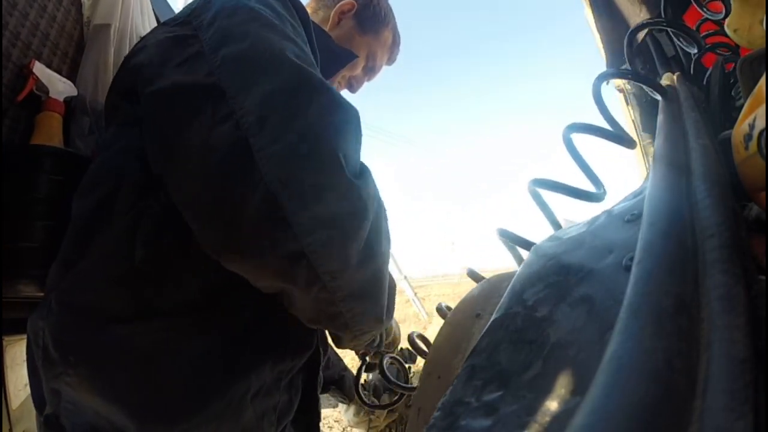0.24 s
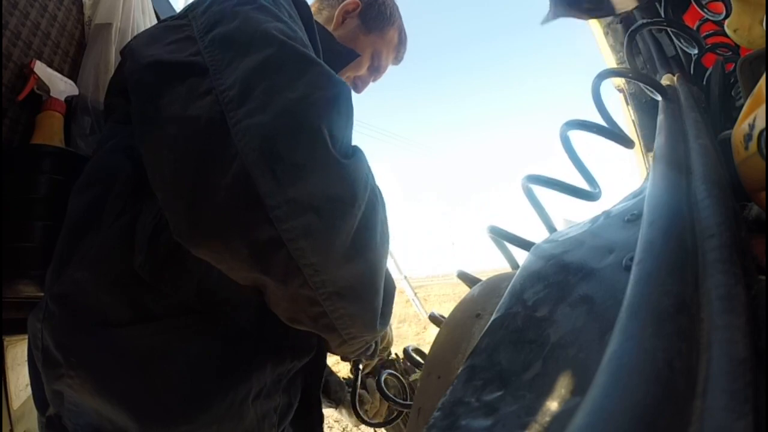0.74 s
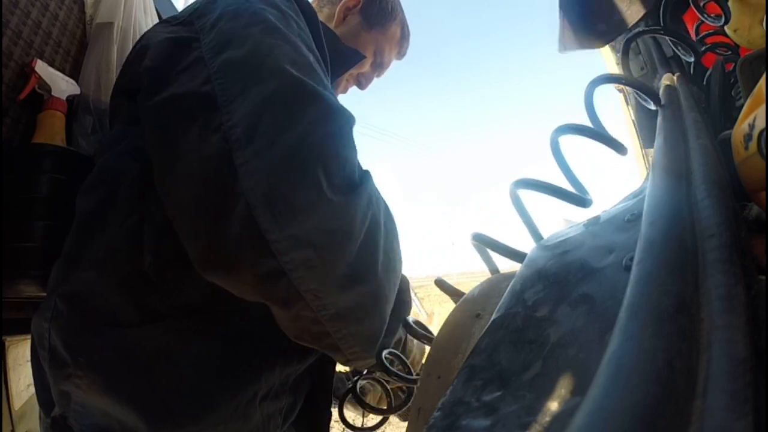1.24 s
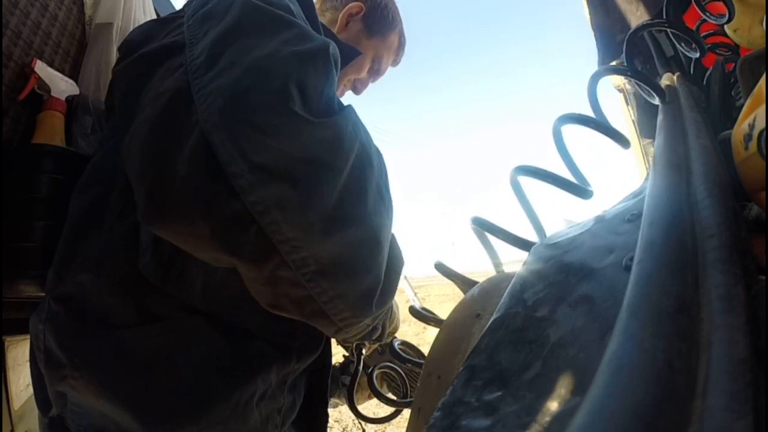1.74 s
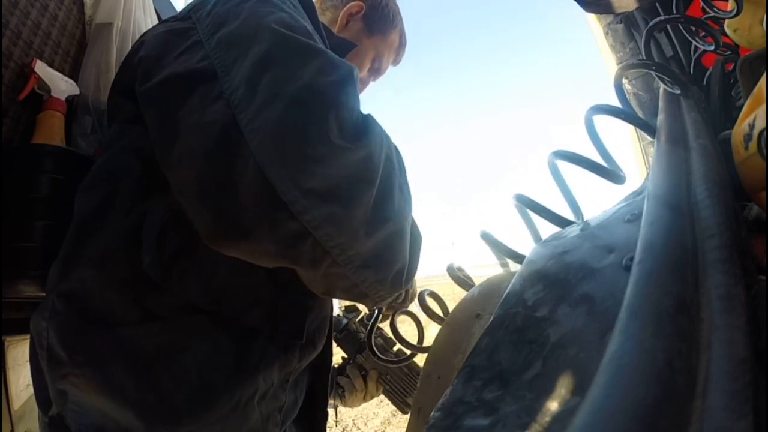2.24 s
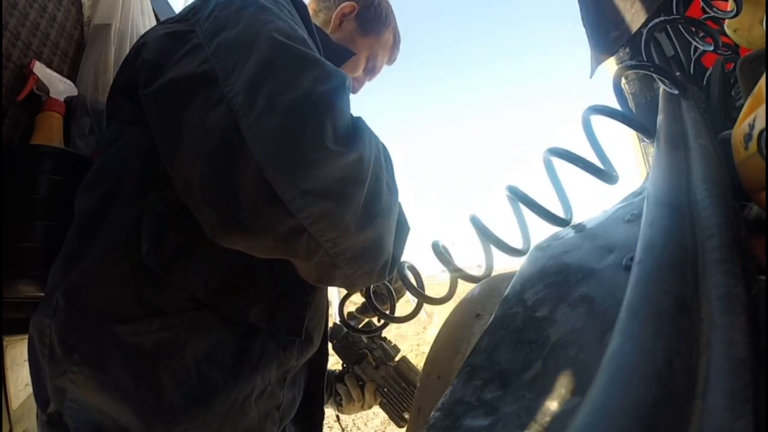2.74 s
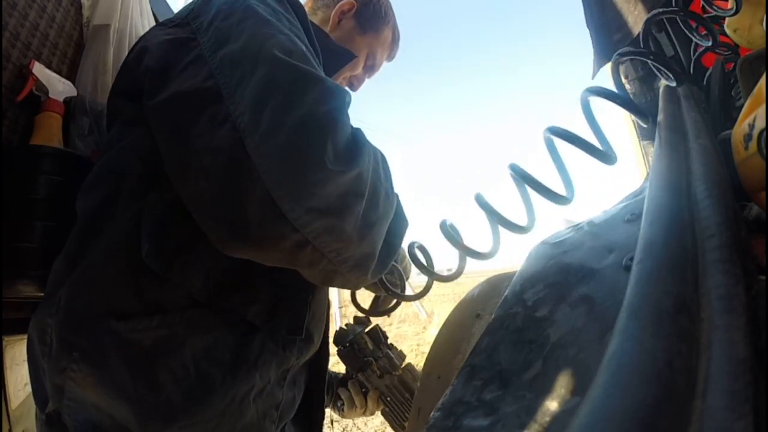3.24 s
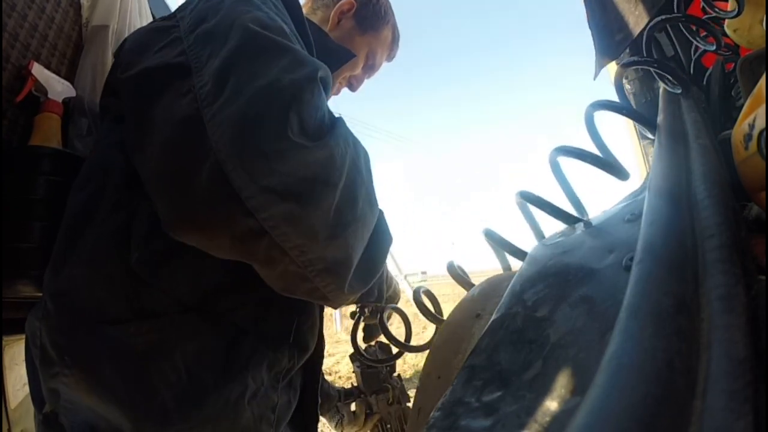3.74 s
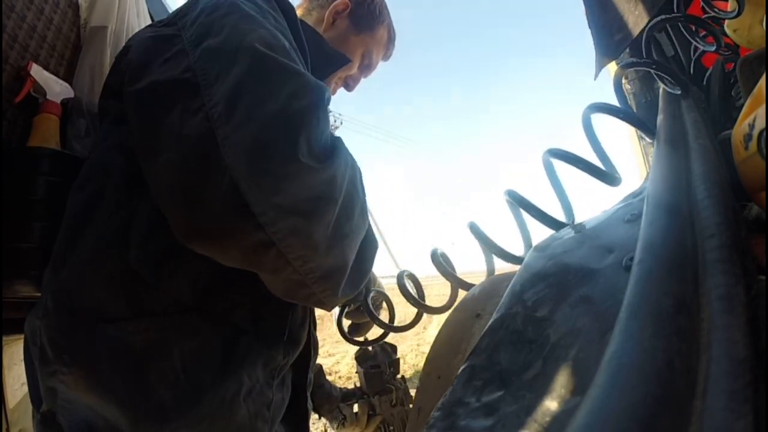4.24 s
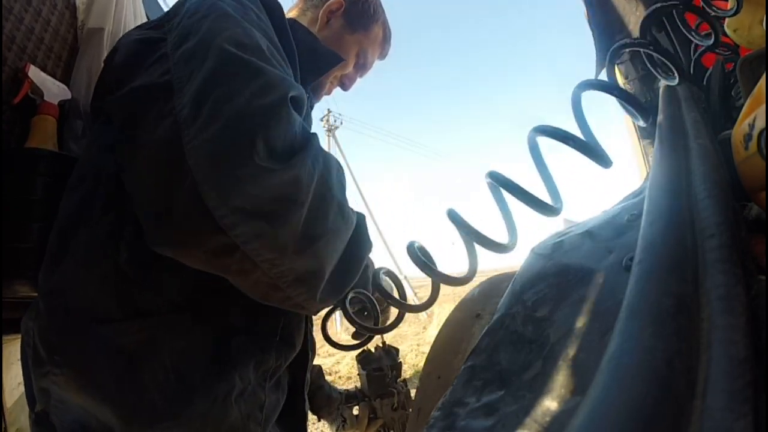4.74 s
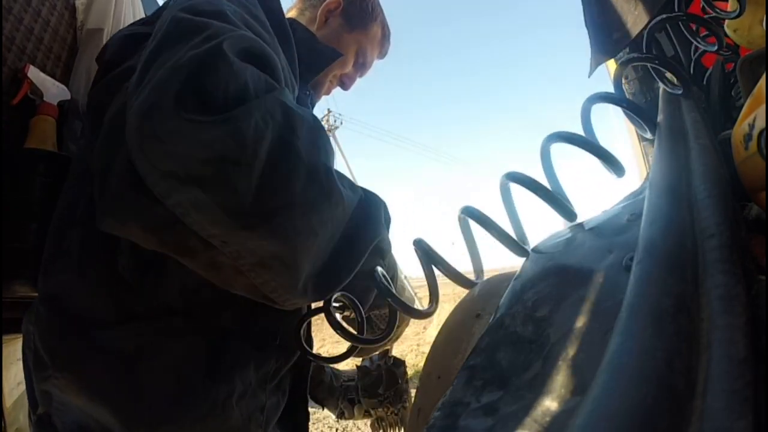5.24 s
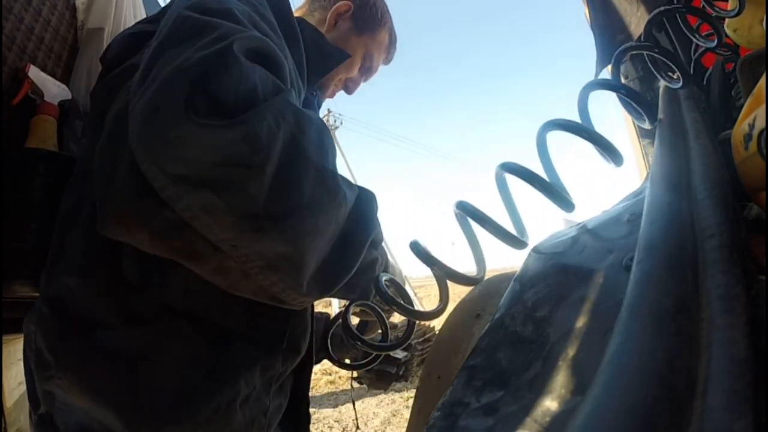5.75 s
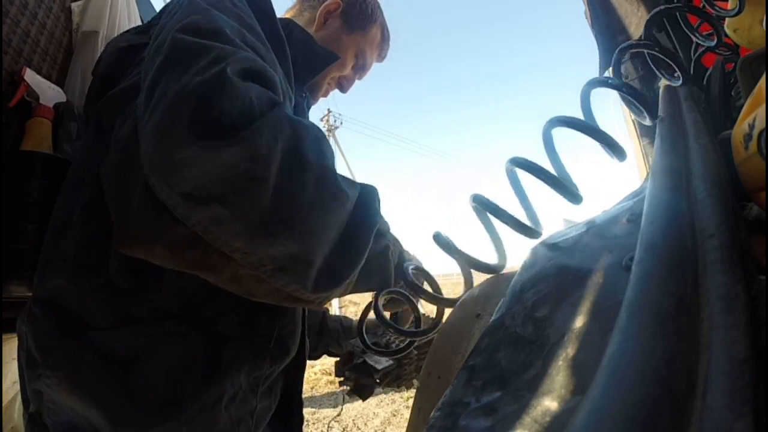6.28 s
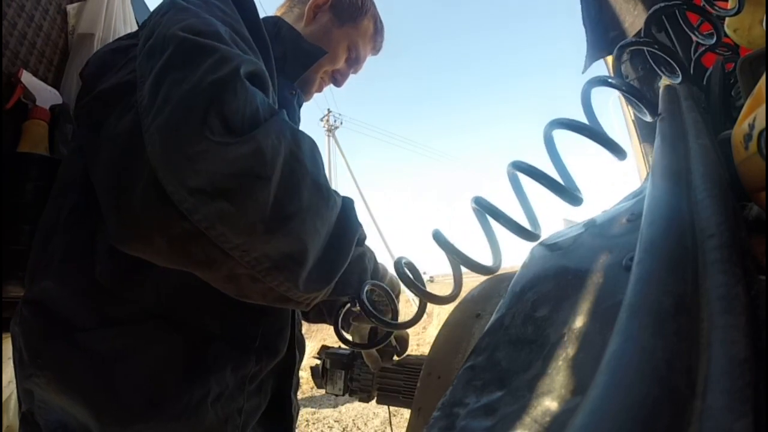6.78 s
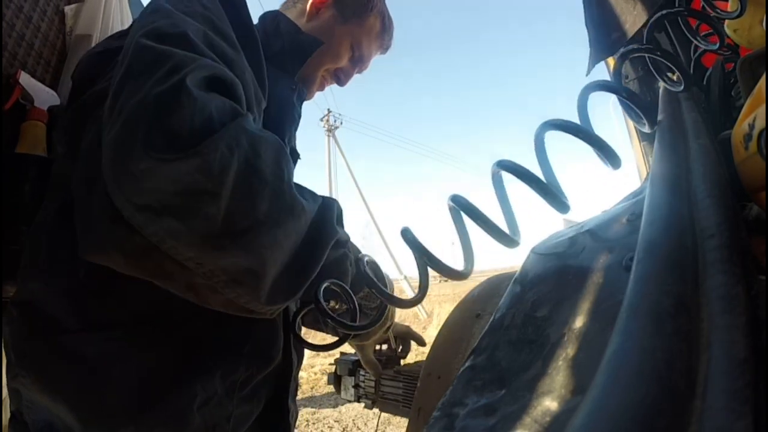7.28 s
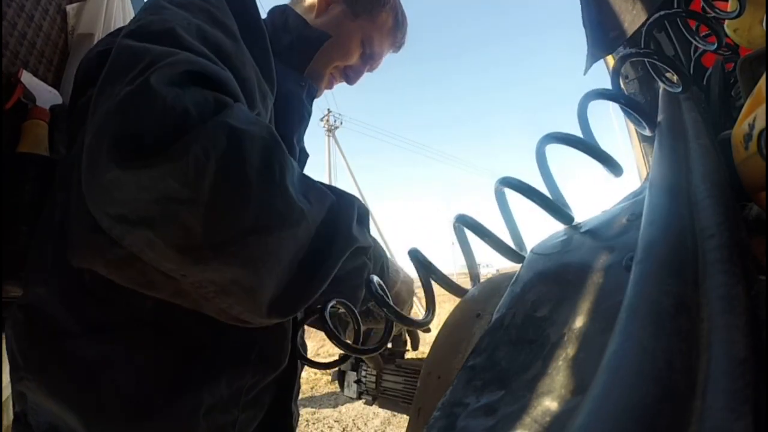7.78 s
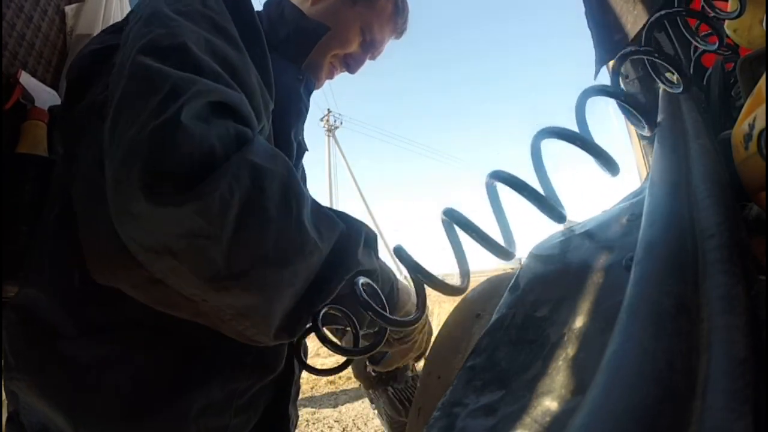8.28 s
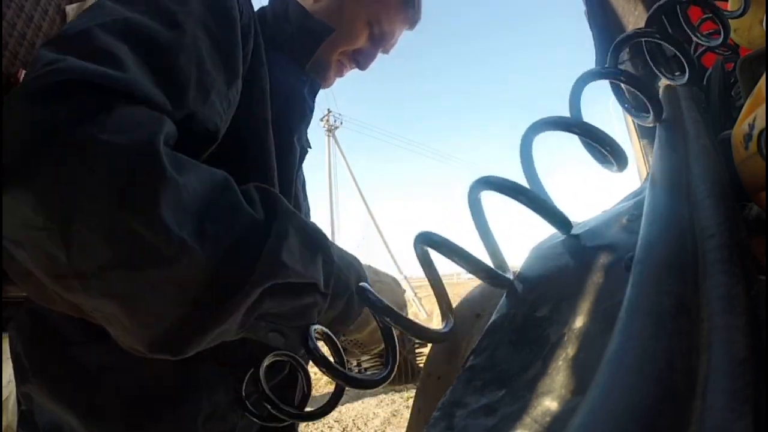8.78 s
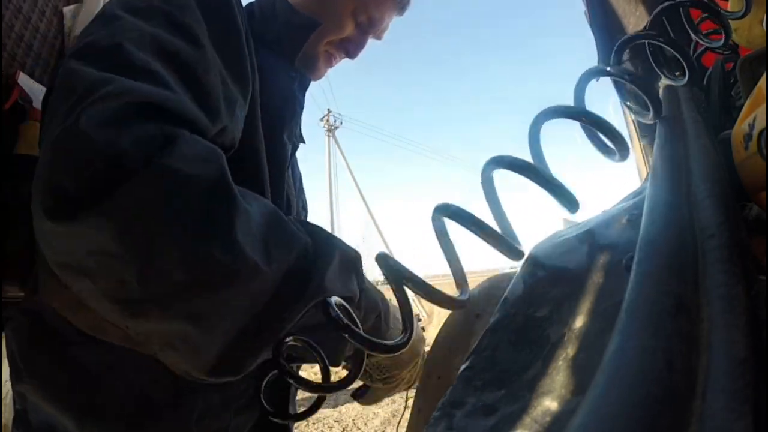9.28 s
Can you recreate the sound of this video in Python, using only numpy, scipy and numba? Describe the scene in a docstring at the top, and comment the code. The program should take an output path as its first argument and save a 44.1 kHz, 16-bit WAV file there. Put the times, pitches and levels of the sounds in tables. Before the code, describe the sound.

Close to the microphone, a compressed-air gun blasts dust off a metal heater in eleven bursts. The first four grow longer, their bright hiss wavering, chirping on edges and roaring in hollows; later ones are mostly brief puffs. A low droning rumble and soft rushing continue underneath. Soft thuds, light ticks and a faintly ringing hose scrape come towards the end. Outdoors by a shed, nearly dry.

```python
"""Blow gun bursts at a shed door

Eleven bursts from a compressed-air blow gun clean a heater: filtered noise shares one valve flow, and the
aim balances free-jet hiss, pitched edge hiss, splash on the casing and roar in hollows. Short swells of
pitched hiss add edge chirps, low hollow gusts and a small spit on opening.
A low rumble with a drone, a rushing and open-air hiss go on throughout; a hum swells twice.
Decaying sines make soft bumps, noise taps make ticks; near the end the hose drags over ringing steel."""
import sys
import numpy as np
from scipy import signal
from scipy.fft import rfft, irfft, next_fast_len
from scipy.io import wavfile
from scipy.ndimage import uniform_filter1d
from numba import njit

SR = 44100
rng = np.random.default_rng(int(sys.argv[2]) if len(sys.argv) > 2 else 0)


def inscribe(sig):
    """Save sig as 16-bit PCM at rate SR to the path in sys.argv[1].

    A 1-D sig is mono; a 2-D sig holds one channel per row.
    Samples are clipped to [-1, 1] before scaling.
    """
    pcm = np.round(np.clip(np.atleast_2d(sig).T, -1, 1) * 32767)
    wavfile.write(sys.argv[1], SR, pcm.astype(np.int16))


N = 419832

# Table levels are relative; the functions add trims. Spectra are scaled to rms 1.
# rumble and rushing drift: (time [s], level [dB])
RUMBLE_LEVEL = [(0, -28.5), (.45, -33.5), (1.25, -32.5), (1.85, -33), (2.15, -32), (2.8, -30), (3.3, -36),
                (3.6, -33.5), (4.3, -31.5), (4.8, -33.5), (5.2, -30.5), (5.7, -28.5), (6.2, -33.5),
                (7.38, -26.5), (7.52, -37.5), (7.95, -31), (9.2, -28), (9.5, -29.5)]
RUSH_LEVEL = [(0, -37.5), (.7, -36.5), (2.3, -37.5), (3.3, -44), (4.1, -41.5), (4.8, -41.5), (6, -38),
              (6.3, -42), (7.25, -37), (7.6, -45.5), (8.05, -37.5), (8.5, -35), (9.3, -30.5)]
# spectra of rumble, rushing, open air: (frequency [Hz], density [dB])
RUMBLE_SPECTRUM = [(15, -17.5), (30, -4.5), (48, -3.5), (68, 2.5), (92, -6), (112, -5.5), (150, -9),
                   (230, -27), (500, -63), (3000, -90.5)]
RUSH_SPECTRUM = [(80, -16), (150, -1), (200, 2.5), (250, -2.5), (400, -2), (540, -8), (850, -13.5),
                 (1050, -19.5), (2000, -29), (4000, -49.5), (12000, -83)]
AIR_SPECTRUM = [(300, -9), (900, 8), (1500, -1), (2200, -5.5), (4400, -13), (7000, -22), (10000, -29.5),
                (15000, -35)]
# hum swells: (centre time [s], level [dB], pitch [Hz], Gaussian sigma [s])
SWELLS = [(0.578, -38, 401, 0.13), (2.256, -34.5, 391, 0.1)]
# hose drag: (time [s], level [dB])
DRAG_LEVEL = [(7.7, -51.5), (7.9, -46), (8.07, -36.5), (8.3, -39.5), (8.58, -34), (8.72, -42.5),
              (9.2, -40.5), (9.5, -45)]
# friction spectrum of hose and sleeve: (frequency [Hz], density [dB])
RUSTLE_SPECTRUM = [(60, -3), (150, 2), (500, -4), (1100, -3.5), (2000, -6.5), (4000, -11.5), (6000, -19),
                   (10000, -31), (15000, -44.5)]
# steel resonances: (frequency [Hz], width [Hz], level [dB])
STEEL = [(172, 32, 0.5), (314, 82, -6), (505, 52, 3), (693, 110, -2), (917, 69, -3), (1123, 88, -2),
         (1560, 53, -1), (2460, 140, -12), (4250, 460, -20)]
# light ticks of hose and tool: (time [s], level [dB])
TICKS = [(3.838, -43.5), (5.114, -40.5), (5.29, -46.5), (6.349, -44), (7.774, -35), (8.018, -39),
         (8.326, -27), (8.607, -32), (8.811, -29.5), (9.455, -40.5)]
# tick spectrum: (frequency [Hz], density [dB])
TICK_SPECTRUM = [(300, -3), (1200, 10), (4000, -2), (9000, -24), (15000, -32)]
# soft bumps: (time [s], level [dB], pitch [Hz], t60 [s])
BUMPS = [(2.815, -14.5, 170, 0.037), (7.822, -15, 190, 0.049), (7.93, -12.5, 65, 0.087),
         (7.929, -14, 150, 0.064), (8.061, -16, 64.3, 0.087)]
# trigger pulls: (open time [s], release time [s], free jet level [dB], edge pitch [Hz],
# edge width / pitch [1], hollow roar re splash [dB])
PULLS = [(.205, 0.562, -29, 5500, .65, -7), (0.915, 1.61, -28.2, 5500, 0.75, -7.5),
         (1.975, 3.331, -26.4, 5200, 0.84, -11.5), (3.991, 4.971, -24.5, 5060, 0.97, -13.5),
         (6.034, 6.204, -22, 4620, .8, -17.5), (6.569, 6.699, -23, 5100, .65, -7),
         (6.943, 7.069, -26, 4500, .6, -4.5), (7.304, 7.657, -27, 5020, .53, -8.5),
         (8.088, 8.266, -31, 4800, .7, -8.5), (8.42, 8.534, -29, 5300, 0.94, -10),
         (9.06, 9.38, -27.5, 5100, .75, -7.5)]
# trigger eased: (start [s], end [s], flow change [dB])
EASED = [(1.571, 1.66, -19), (6.676, 6.757, -15), (7, 7.131, -14.5), (8.192, 8.23, -0.5), (8.5, 8.59, -9.5)]
# nozzle aim, one list per pull: (time [s], edge hiss level [dB], splash level [dB])
AIM = [
    [(0.221, -27, -21), (0.253, -34, -27.5), (0.276, -19.5, -19), (0.294, -30, -30), (0.342, -11.5, -25.5),
     (0.419, -31.5, -33), (0.442, -19.5, -26.5), (0.463, -28.5, -30.5), (0.563, -28, -31.5)],
    [(0.927, -27, -28.5), (0.95, -13.5, -18.5), (1.009, -21.5, -17.5), (1.11, -17, -27.0),
     (1.153, -28, -32.0), (1.285, -19, -27), (1.356, -20, -20), (1.398, -14, -23.5), (1.458, -23.5, -38),
     (1.512, -30.5, -28.5), (1.531, -16, -24), (1.562, -17.5, -24.5)],
    [(1.979, -17, -21.5), (2.076, -23, -20.5), (2.154, -29.5, -32.5), (2.248, -29, -27.5),
     (2.288, -19, -20.5), (2.473, -29.5, -23.0), (2.493, -17.5, -20.5), (2.597, -18.0, -20.5),
     (2.62, -26.5, -25), (2.688, -28.5, -23.0), (2.706, -18.5, -22.5), (2.768, -18.5, -25),
     (2.826, -27, -24), (2.91, -16, -20), (3.041, -28, -24.5), (3.138, -14, -23.5), (3.205, -36.0, -34),
     (3.332, -31, -27)],
    [(3.994, -20, -27), (4.032, -19.5, -20.5), (4.165, -20.0, -25), (4.194, -23, -22.5),
     (4.362, -23, -28.5), (4.444, -27, -24), (4.655, -21, -24.0), (4.772, -25.5, -25.5),
     (4.969, -23.5, -23)],
    [(6.038, -21.5, -18.5), (6.2, -19, -20)],
    [(6.584, -19, -25.5), (6.66, -21, -27.5)],
    [(6.944, -16.5, -28), (6.99, -16.0, -27.5)],
    [(7.331, -17.0, -26), (7.482, -13.5, -28.5), (7.564, -23.5, -32.5), (7.639, -20.0, -32.5)],
    [(8.092, -17.5, -26.5), (8.147, -22, -33.0), (8.176, -21.5, -20.5), (8.215, -41.5, -37),
     (8.25, -23.5, -23.5)],
    [(8.448, -24, -33), (8.491, -23.5, -29)],
    [(9.068, -15.5, -22.5), (9.209, -18.5, -27.0), (9.257, -22.5, -25), (9.352, -31.0, -36.5)],
]
# short swells of pitched hiss (edge chirps, low hollow gusts, a small spit on opening):
# (centre time [s], level [dB], pitch [Hz], Gaussian sigma [s])
HISS_SWELLS = [(0.217, -23, 2400, 0.0062), (0.236, -22.5, 1150, .018), (0.295, -28, 6000, 0.0073),
               (0.334, -20, 7200, 0.014), (0.982, -18, 5600, 0.0062), (1.2, -20, 10000, .01),
               (1.534, -25, 4960, 0.0046), (1.555, -18, 4600, 0.004), (2.366, -26, 1100, 0.074),
               (2.405, -16, 2860, 0.022), (2.588, -18, 4030, 0.0054), (2.716, -11.5, 3800, 0.0029),
               (2.95, -12.5, 4170, 0.0083), (3.113, -20, 6900, 0.0078), (3.236, -27, 4200, 0.023),
               (3.275, -23, 4500, .006), (3.33, -20, 1250, 0.0063), (4.16, -15, 4480, .007),
               (4.691, -12.5, 9550, 0.0029), (4.74, -13, 4170, 0.015), (4.784, -14, 4050, 0.0084),
               (4.869, -14, 3500, .01), (4.962, -16.5, 11400, .005), (6.128, -17.5, 4400, 0.013),
               (6.155, -16.5, 8440, .016), (6.656, -13.5, 4380, 0.012), (7.658, -12.5, 5100, 0.0056),
               (8.094, -11.5, 7500, 0.0031), (8.17, -12, 3600, 0.0045), (8.417, -29, 6900, .002),
               (8.491, -21.5, 2700, 0.0045), (9.377, -21.5, 5620, 0.0055)]
# spectra of free jet, splash on casing, air caught in hollows: (frequency [Hz], density [dB])
JET_SPECTRUM = [(100, -40), (300, -21), (1500, -11), (3000, -6), (6000, 0.5), (9000, 3), (12000, -1),
                (15000, -2), (16000, -19.5)]
SPLASH_SPECTRUM = [(300, -49.5), (1000, -15), (1700, -8), (2000, -2.5), (2400, 4), (3600, -3), (4300, -2),
                   (5500, -13.5), (9000, -31.5)]
HOLLOW_SPECTRUM = [(60, -38.5), (150, -20), (350, -4.5), (650, -6.5), (880, -1.5), (1050, -8), (1400, -3.5),
                   (1750, 0), (2600, -24.5), (5000, -41.5)]
# casing resonances and dips: (frequency [Hz], width [Hz], gain [dB])
CASING = [(890, 46, 1), (1026, 90, -8.5), (1540, 90, 1.5), (1780, 100, -6.5), (1922, 75, 4.5),
          (2420, 200, 0), (2680, 250, -5.5), (3035, 100, 3), (3670, 110, 4), (5230, 160, 2.5),
          (5930, 130, -1), (7840, 240, 1.5), (11700, 250, 2.5)]
# near surfaces mirroring the jet: (mean delay [ms], amplitude share [1])
MIRRORS = [(.9, 0.27), (1.7, .2), (2.9, 0.22), (4.7, 0.22), (7.3, 0.16)]


def undb(db):
    """Decibels to amplitude gain."""
    return 10 ** (np.asarray(db) / 20)


def unit(x):
    """Scale to rms 1."""
    return x / np.sqrt(np.mean(x ** 2))


def curves(table):
    """Join each column of (time, ..) rows by straight lines."""
    time_s, *columns = np.transpose(table)
    return [np.interp(np.arange(N) / SR, time_s, column) for column in columns]


def colour(x, spectrum):
    """Filter by a spectrum interpolated over log frequency; rms 1."""
    hz, db = np.transpose(spectrum)
    size = next_fast_len(N, real=True)
    bin_hz = np.maximum(np.fft.rfftfreq(size, 1 / SR), 1)
    gain = undb(np.interp(np.log(bin_hz), np.log(hz), db))
    return unit(irfft(rfft(x, size) * gain, size)[:N])


def noise(spectrum):
    """Noise with a given spectrum; rms 1."""
    return colour(rng.standard_normal(N), spectrum)


def walk(rate_hz):
    """Random levels, held one period and smoothed twice; rms 1."""
    hold = int(SR / rate_hz)
    steps = np.repeat(rng.standard_normal(N // hold + 1), hold)
    smooth = uniform_filter1d(uniform_filter1d(steps, hold), hold)
    return unit(smooth[:N])


def ring(x, hz, width_hz):
    """Fixed resonance, gain 1 at its centre."""
    return signal.lfilter(*signal.iirpeak(hz, hz / width_hz, fs=SR), x)


def ringing_noise(length, hz, width_hz, second_width):
    """Noise through two resonances, the second wider by a factor; rms 1."""
    once = ring(rng.standard_normal(length), hz, width_hz)
    return unit(ring(once, hz, second_width * width_hz))


@njit
def sweep(x, hz, relative_width):
    """State-variable band-pass with moving centre and moving relative width."""
    y, band, low = np.empty(len(x)), 0., 0.
    for i in range(len(x)):
        g = np.tan(np.pi * hz[i] / SR)
        v = (band + g * (x[i] - low)) / (1 + g * (g + relative_width[i]))
        band, low, y[i] = 2 * v - band, low + 2 * g * v, relative_width[i] * v
    return y


def rumble(noise_trim_db=-.5, drone_db=-7.0, drone_hz=93.45, drone_width_hz=4., throb_rms_db=1.0):
    """Deep noise plus a wavering narrow-band drone, throbbing and drifting together."""
    drone = ringing_noise(N, drone_hz, drone_width_hz, 3)
    mix = undb(noise_trim_db) * noise(RUMBLE_SPECTRUM) + undb(drone_db) * drone
    return mix * undb(curves(RUMBLE_LEVEL)[0] + throb_rms_db * walk(18))


def rushing(trim_db=0.5, sway_rms_db=1.0):
    """Low-mid noise with a drifting, swaying level."""
    return noise(RUSH_SPECTRUM) * undb(curves(RUSH_LEVEL)[0] + trim_db + sway_rms_db * walk(14))


def hum_swells(width_hz=24.):
    """Wavering narrow-band hum under Gaussian envelopes."""
    t, out = np.arange(N) / SR, np.zeros(N)
    for centre_s, db, hz, sigma_s in SWELLS:
        envelope = np.exp(-.5 * ((t - centre_s) / sigma_s) ** 2)
        out += undb(db) * ringing_noise(N, hz, width_hz, 3) * envelope
    return out


def open_air(level_db=-50.0, sway_rms_db=0.39):
    """Faint, slowly swaying hiss."""
    return noise(AIR_SPECTRUM) * undb(level_db + sway_rms_db * walk(2.3))


def background():
    """Sum of the rumble, rushing, hum swells and open air."""
    return rumble() + rushing() + hum_swells() + open_air()


def hose(grain_rms_db=2.0, jerk_rms_db=0.0, contact_rms_db=3.5, steel_trim_db=2.0, rustle_trim_db=-7.0):
    """Stick-slip of hose and sleeve: grainy noise, direct and through steel resonances."""
    grain = undb(grain_rms_db * walk(400) + jerk_rms_db * walk(25))
    slips = colour(rng.standard_normal(N) * grain, RUSTLE_SPECTRUM)
    # the contact point moves, so the resonances come and go
    modes = [undb(db + contact_rms_db * walk(12)) * ring(slips, hz, width_hz) for hz, width_hz, db in STEEL]
    steel = unit(sum(modes))
    dragging = np.arange(N) / SR > DRAG_LEVEL[0][0]
    mix = undb(steel_trim_db) * steel + undb(rustle_trim_db) * slips
    return mix * undb(curves(DRAG_LEVEL)[0]) * dragging


def ticks(trim_db=-4.0, t60_s=0.063):
    """Light, dull taps: coloured noise under softened exponential decays."""
    taps = np.zeros(N)
    for time_s, db in TICKS:
        taps[int(time_s * SR)] = undb(db + trim_db)
    decay = np.exp(-np.log(1000) / (t60_s * SR))
    fading = signal.lfilter([1], [1, -decay], taps)
    return uniform_filter1d(fading, size=64) * noise(TICK_SPECTRUM)


def bumps():
    """Soft, quickly damped thuds: decaying sines."""
    out, t = np.zeros(N), np.arange(SR // 4) / SR
    for time_s, db, hz, t60_s in BUMPS:
        start = int(time_s * SR)
        decay = np.exp(-np.log(1000) * t / t60_s)
        out[start:start + len(t)] += undb(db) * np.sin(2 * np.pi * hz * t) * decay
    return out


def nearest_pull():
    """Index of the closest trigger pull for every sample."""
    opened, released = np.transpose(PULLS)[:2]
    return np.searchsorted((released[:-1] + opened[1:]) / 2, np.arange(N) / SR)


def swing(db):
    """Level relative to its mean over the pull, in dB."""
    means = np.array([db[int(opened * SR):int(released * SR)].mean() for opened, released, *_ in PULLS])
    return db - means[nearest_pull()]


def valve(open_s=0.023, open_db=47.0, curve=1.6, close_db_per_s=882.0, ease_s=.02):
    """Air flow 0-1: builds up on the pull, drops when eased, dies away as the nozzle empties."""
    t, flow = np.arange(N) / SR, np.zeros(N)
    for opened, released, *_ in PULLS:
        near = (t > opened - .1) & (t < released + .12)
        early_s = np.maximum(opened - t[near], 0)  # flow is full at the open time
        late_s = np.maximum(t[near] - released, 0)
        flow[near] += undb(-open_db * (early_s / open_s) ** curve - close_db_per_s * late_s)
    eased_db = sum(db * ((t > start) & (t < end)) for start, end, db in EASED)
    return flow * undb(uniform_filter1d(1. * eased_db, size=int(ease_s * SR)))


def hiss_swells(relative_width=0.26, least_width_hz=880.0):
    """Short swells of pitched hiss: band-passed noise under Gaussian envelopes."""
    out = np.zeros(N)
    t = np.arange(-SR // 10, SR // 10) / SR
    for centre_s, db, hz, sigma_s in HISS_SWELLS:
        hiss = ringing_noise(len(t), hz, least_width_hz + relative_width * hz, 2)
        start = int((centre_s + t[0]) * SR)
        out[start:start + len(t)] += undb(db) * hiss * np.exp(-.5 * (t / sigma_s) ** 2)
    return out


def edge_hiss(hz, relative_width, wander_rms=0.083):
    """The jet flaps on an edge, so its band of hiss wanders in pitch; rms 1."""
    hz = np.clip(hz * (1 + wander_rms * walk(60)), 1000, 12000)
    once = sweep(rng.standard_normal(N), hz, relative_width)
    twice = sweep(once, hz, relative_width)
    return unit(twice / np.sqrt(hz * relative_width))  # offset the power change with bandwidth


def blow_gun(edge_trim_db=0.34, jet_trim_db=3.5, splash_trim_db=1.5, hollow_trim_db=2.5,
             flutter_rms_db=1.23, own_rms_db=1.5, jet_follows_edge=.9, jet_stir_limit_db=6.5,
             jet_lost_to_splash=0.38, hollow_steadiness=.25, bend_octaves=0.24, bend_db=10.5,
             sag_s=0.15, surge_db=5.5, surge_octaves=0.15):
    """Four kinds of turbulence share one air flow, balanced by the nozzle aim; short hiss swells are added."""
    opened, _, jet_db, hz, width, hollow_db = np.array(PULLS)[nearest_pull()].T
    edge_db, splash_db = curves(np.vstack(AIM))
    # pressure stored in the hose starts each burst louder and higher, then sags
    surge = np.exp(-np.maximum(np.arange(N) / SR - opened, 0) / sag_s)
    # an edge stirs up the jet and raises its pitch; a flat face of the casing dulls both
    stir_db = jet_follows_edge * np.minimum(swing(edge_db), jet_stir_limit_db)
    stir_db = stir_db - jet_lost_to_splash * swing(splash_db)
    jet_db = jet_db + surge_db * surge + stir_db
    bend = np.tanh(swing(edge_db - splash_db) / bend_db)
    hz = hz * 2 ** (surge_octaves * surge + bend_octaves * bend)
    # the splash feeds the hollows, which swing less
    hollow_db = hollow_db + splash_db - hollow_steadiness * swing(splash_db)
    layers = [(edge_hiss(hz, width), edge_db + edge_trim_db),
              (noise(JET_SPECTRUM), jet_db + jet_trim_db),
              (noise(SPLASH_SPECTRUM), splash_db + splash_trim_db),
              (noise(HOLLOW_SPECTRUM), hollow_db + hollow_trim_db)]
    air = sum(sound * undb(db + own_rms_db * walk(70)) for sound, db in layers)
    return air * undb(flutter_rms_db * walk(160)) * valve() + hiss_swells()


def casing(x, output_db=-2.0, aim_rms_db=2.0):
    """Resonances and dips of the casing, each varying as the aim moves."""
    out = x.copy()
    for hz, width_hz, db in CASING:
        out += (undb(db + aim_rms_db * walk(6.4)) - 1) * ring(x, hz, width_hz)
    return undb(output_db) * out


def mirrors(x, drift_rms=.16):
    """Near surfaces comb the hiss; delays drift as the hand moves."""
    n, out = np.arange(N), x.copy()
    for delay_ms, share in MIRRORS:
        delay = np.round(delay_ms * SR / 1000 * (1 + drift_rms * walk(2.5)))
        out += share * np.interp(n - delay, n, x)
    return out / np.sqrt(1 + sum(share ** 2 for _, share in MIRRORS))


def shed_tail(x, level_db=-29.0, t60_s=0.1):
    """Add a brief shed tail by convolution with decaying noise."""
    t = np.arange(SR // 4) / SR
    tail = rng.standard_normal(len(t)) * np.exp(-np.log(1000) * t / t60_s)
    return x + undb(level_db) * signal.fftconvolve(x, tail / np.linalg.norm(tail))[:N]


def scene():
    """Mono sum in two equal channels; only the blow gun gets casing, mirrors and tail."""
    gun = shed_tail(mirrors(casing(blow_gun())))
    mono = background() + hose() + ticks() + bumps() + gun
    return np.array([mono, mono])


def record(dry, ceiling=1.6, top_hz=15400):
    """Round the highest peaks, then cut the top steeply."""
    rounded = ceiling * np.tanh(dry / ceiling)
    low_pass = signal.ellip(12, .2, 80, top_hz, fs=SR, output="sos")  # .2 dB ripple, 80 dB stop band
    return signal.sosfilt(low_pass, rounded)


dry = scene()
out = record(dry)
inscribe(out)
```